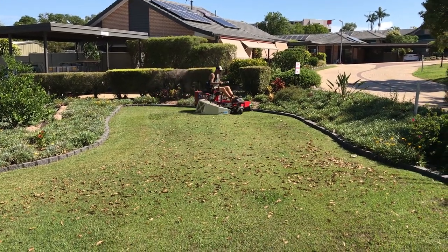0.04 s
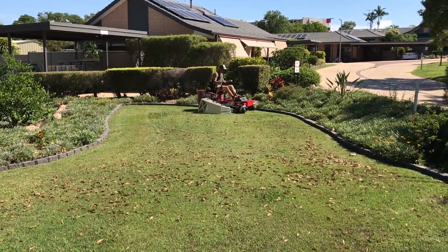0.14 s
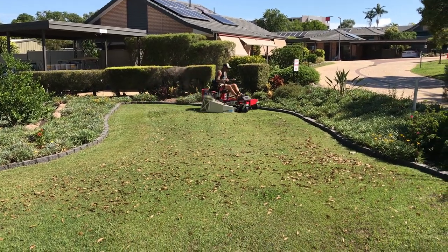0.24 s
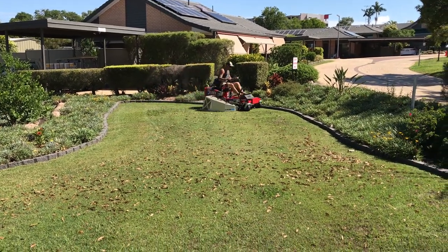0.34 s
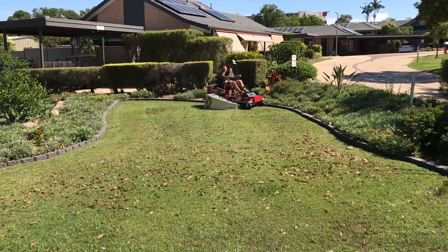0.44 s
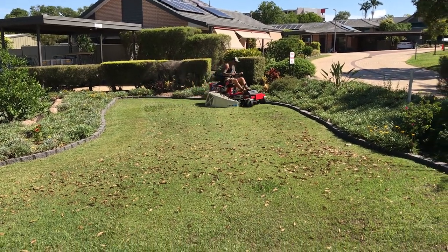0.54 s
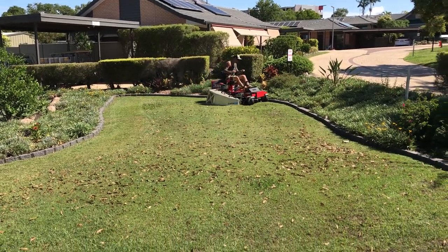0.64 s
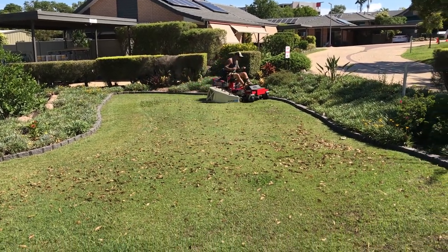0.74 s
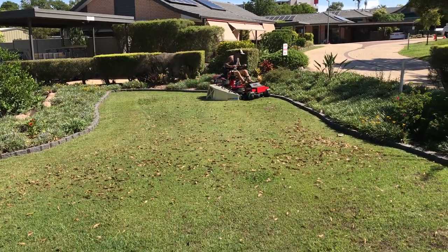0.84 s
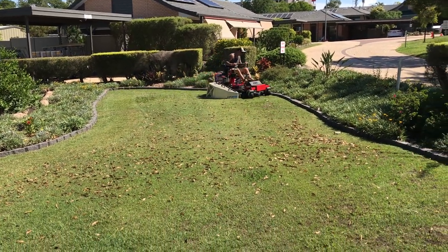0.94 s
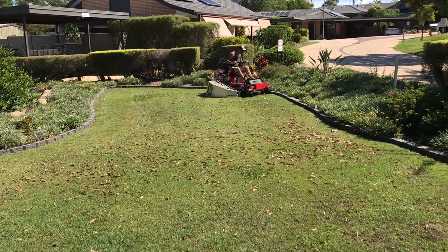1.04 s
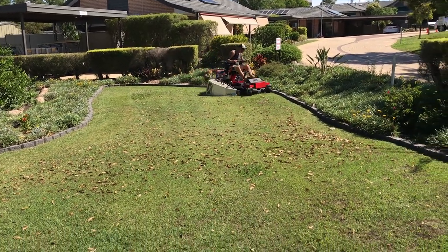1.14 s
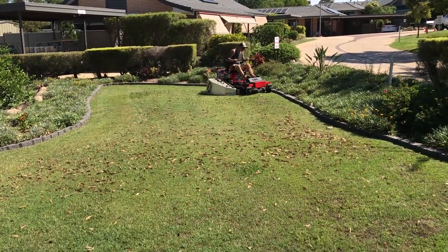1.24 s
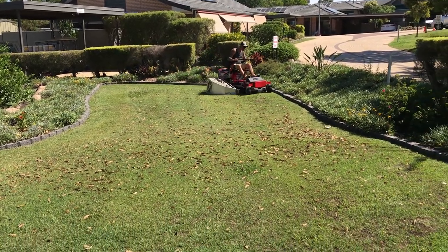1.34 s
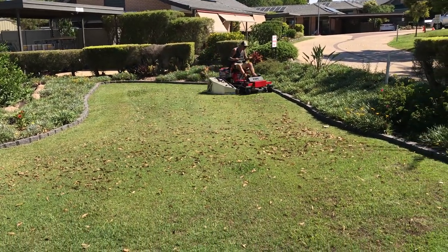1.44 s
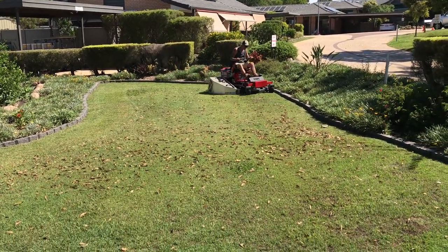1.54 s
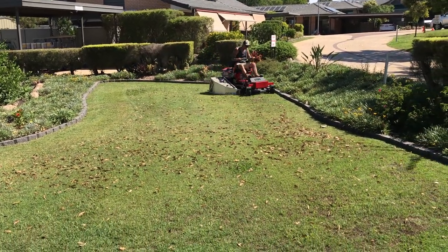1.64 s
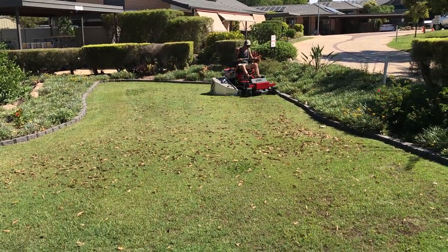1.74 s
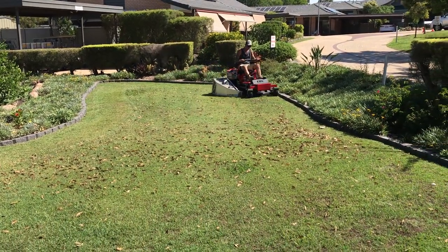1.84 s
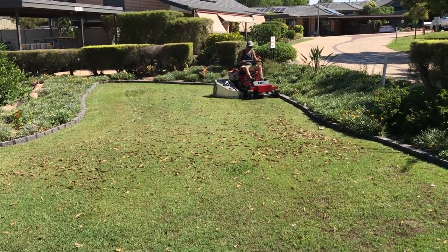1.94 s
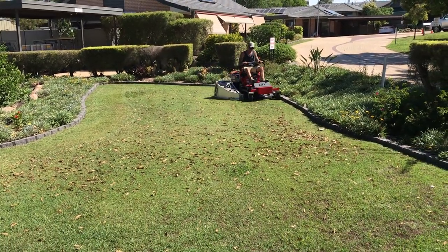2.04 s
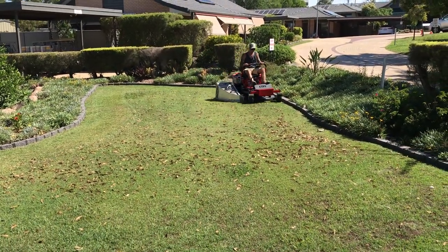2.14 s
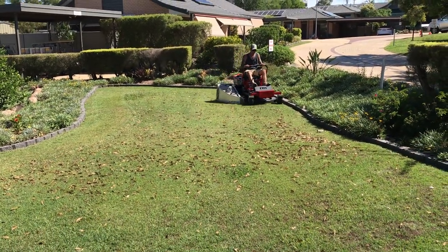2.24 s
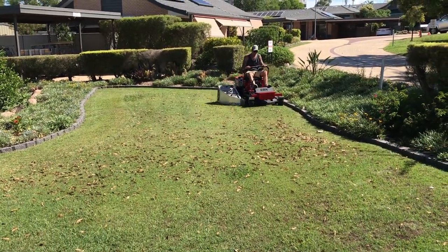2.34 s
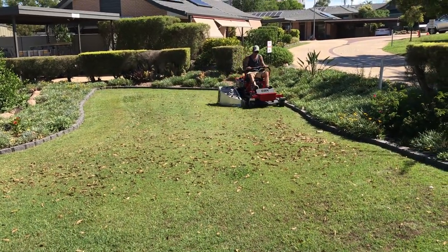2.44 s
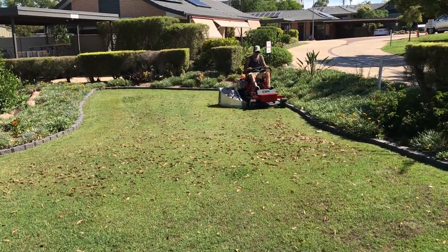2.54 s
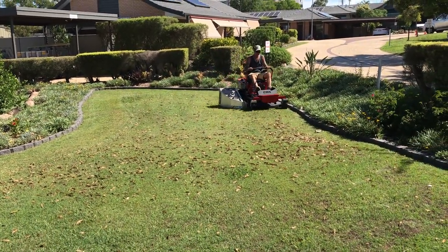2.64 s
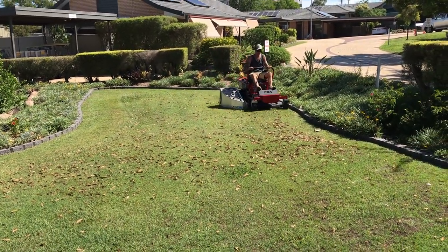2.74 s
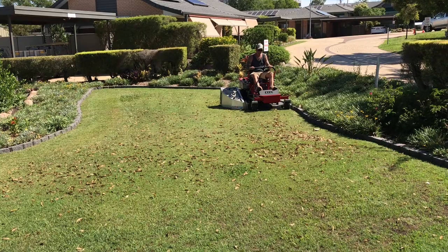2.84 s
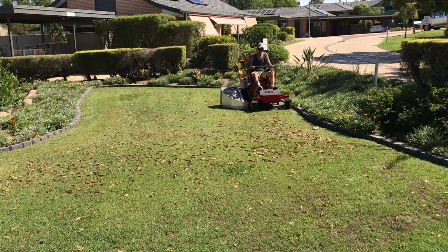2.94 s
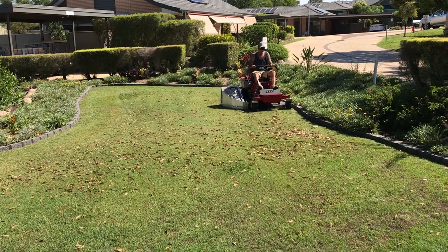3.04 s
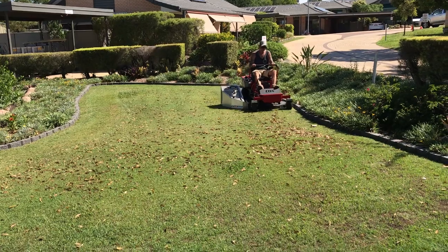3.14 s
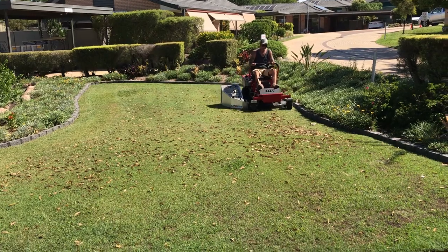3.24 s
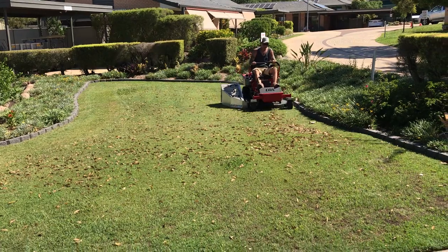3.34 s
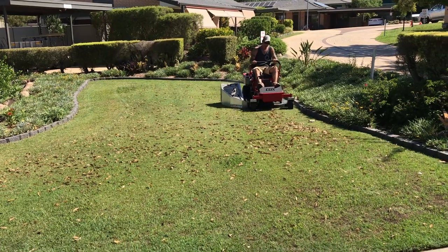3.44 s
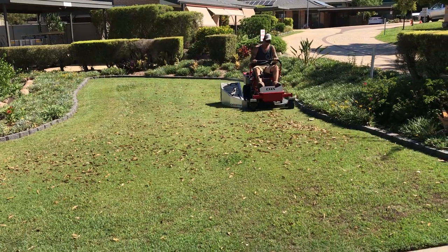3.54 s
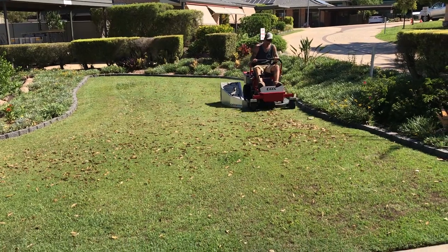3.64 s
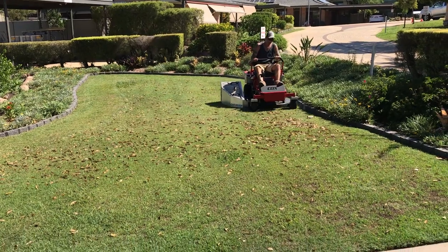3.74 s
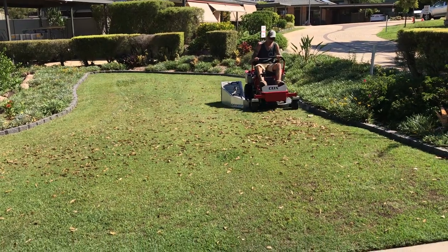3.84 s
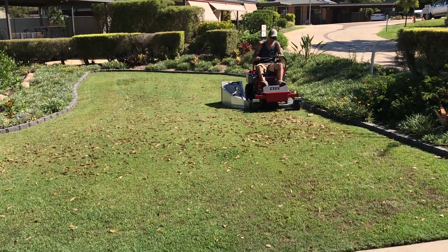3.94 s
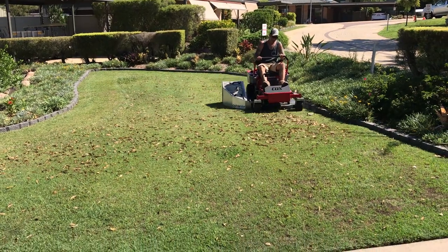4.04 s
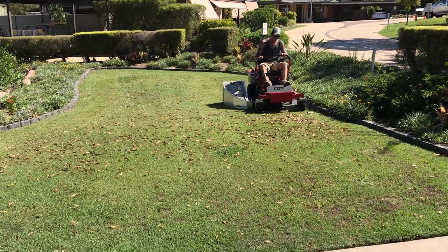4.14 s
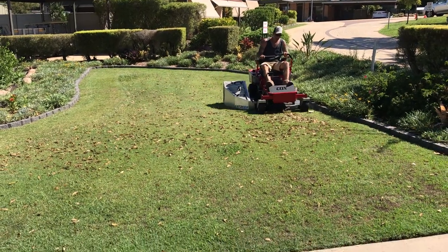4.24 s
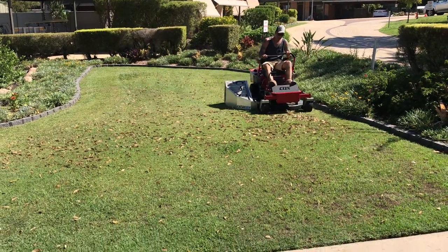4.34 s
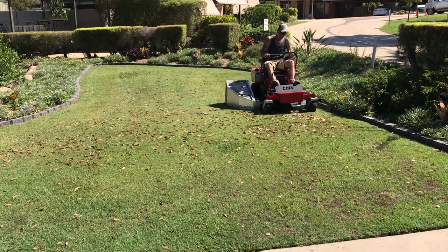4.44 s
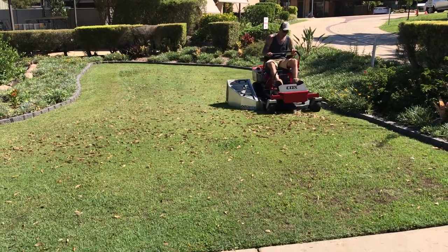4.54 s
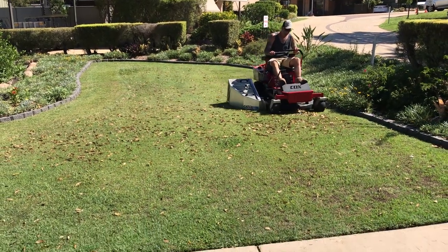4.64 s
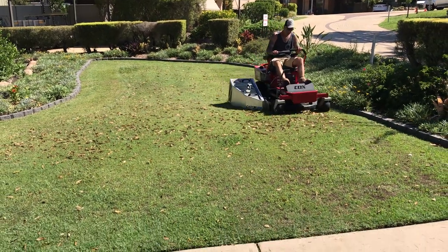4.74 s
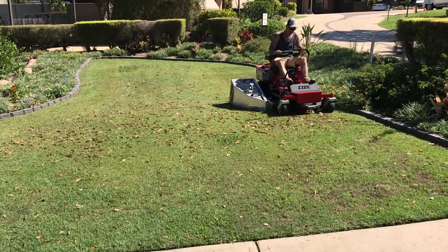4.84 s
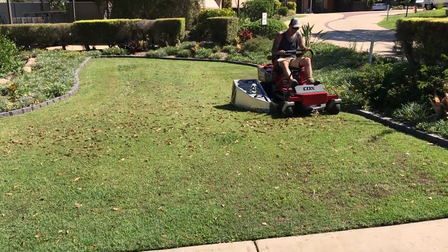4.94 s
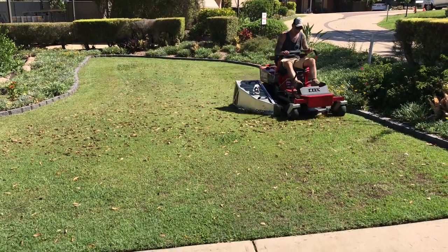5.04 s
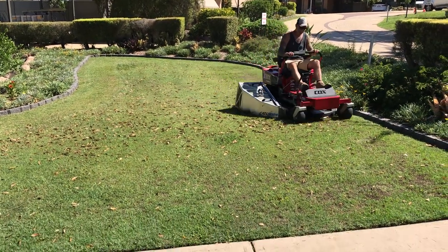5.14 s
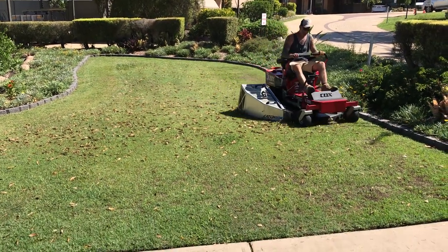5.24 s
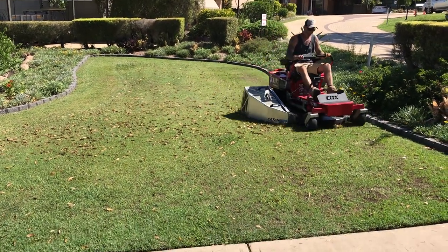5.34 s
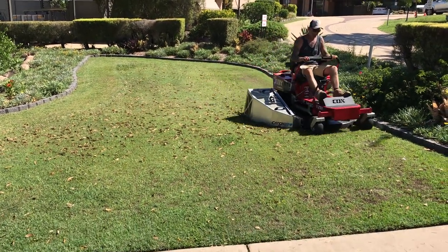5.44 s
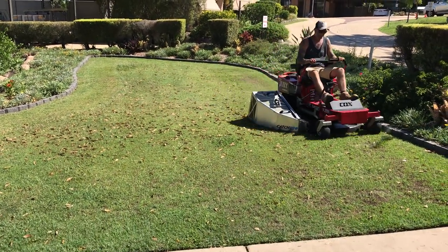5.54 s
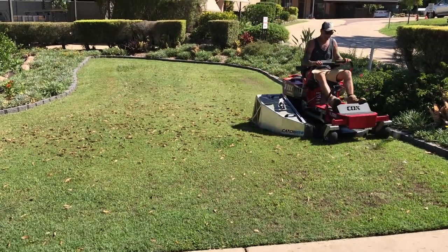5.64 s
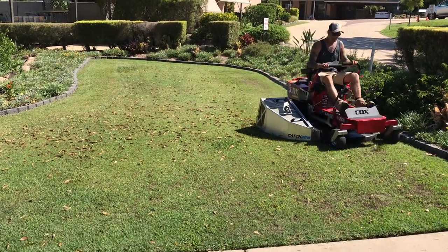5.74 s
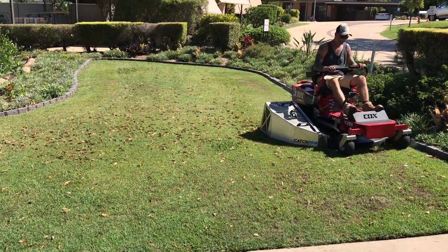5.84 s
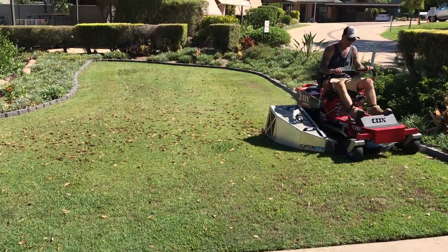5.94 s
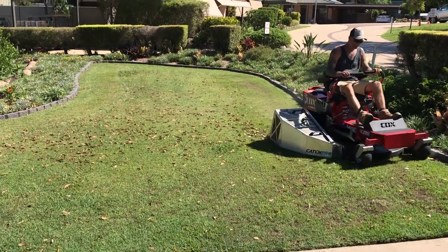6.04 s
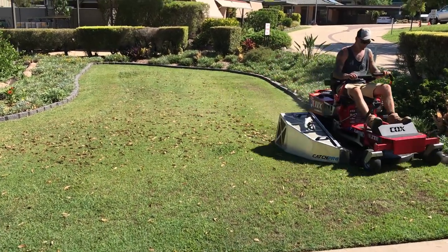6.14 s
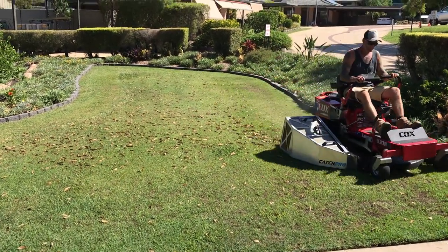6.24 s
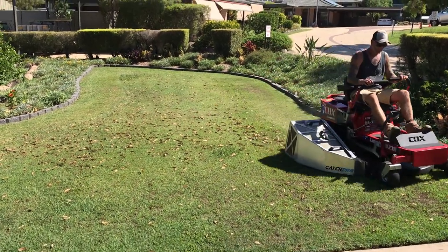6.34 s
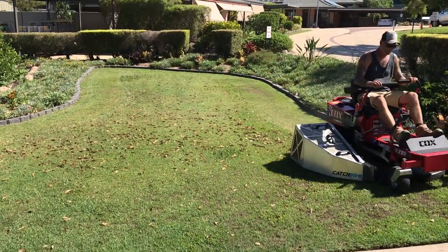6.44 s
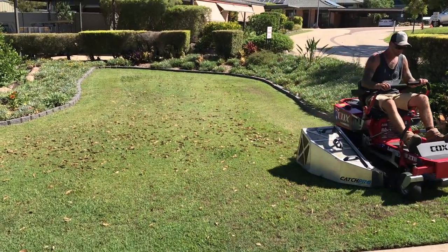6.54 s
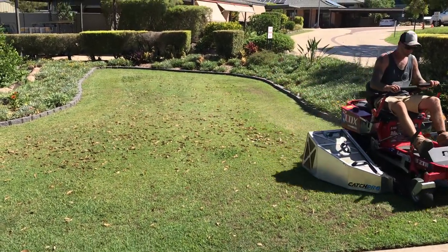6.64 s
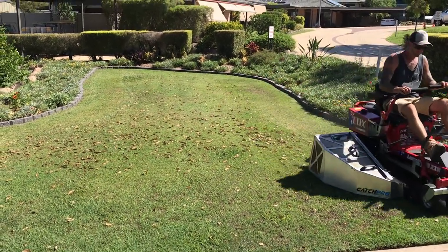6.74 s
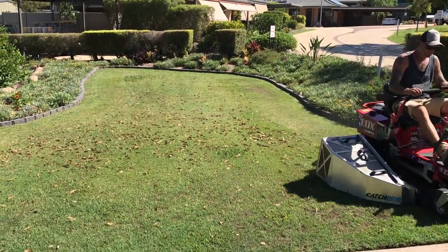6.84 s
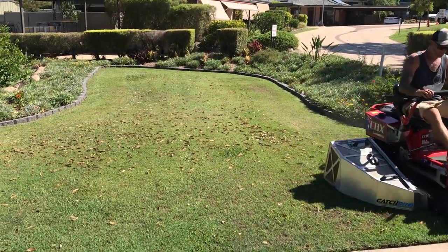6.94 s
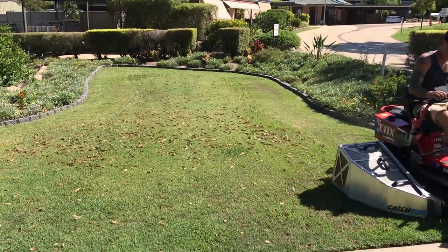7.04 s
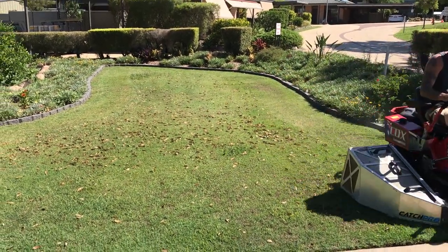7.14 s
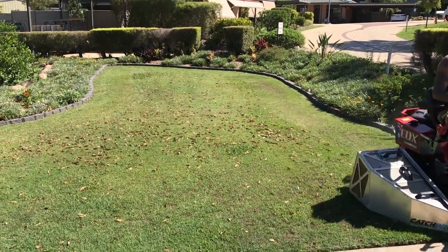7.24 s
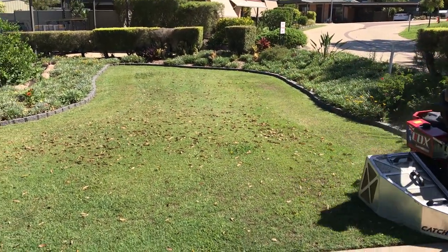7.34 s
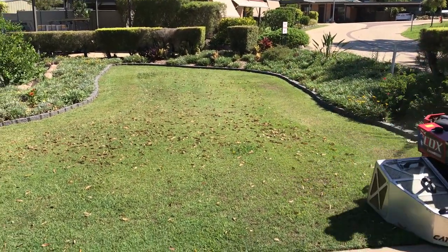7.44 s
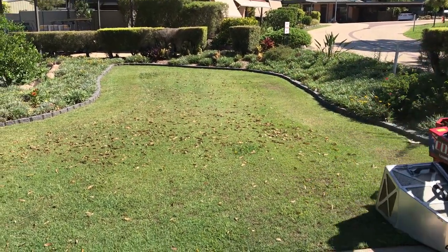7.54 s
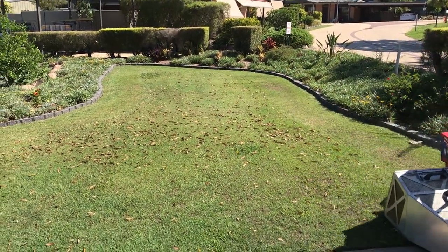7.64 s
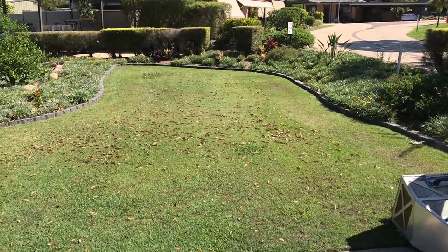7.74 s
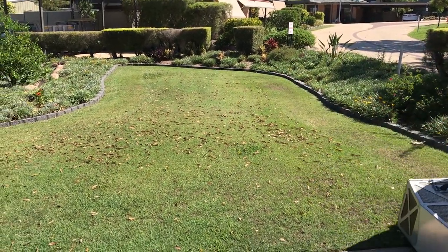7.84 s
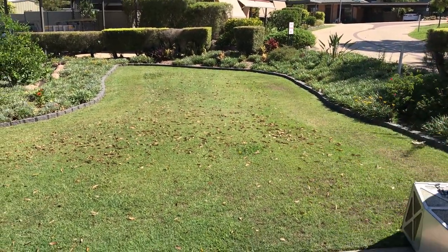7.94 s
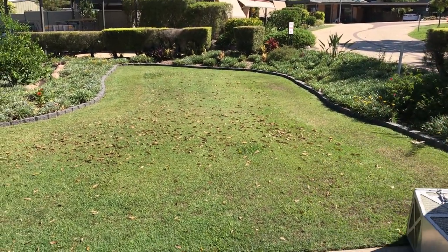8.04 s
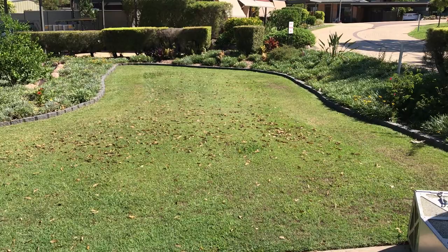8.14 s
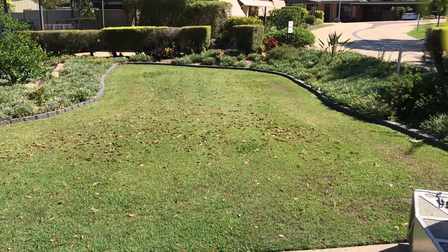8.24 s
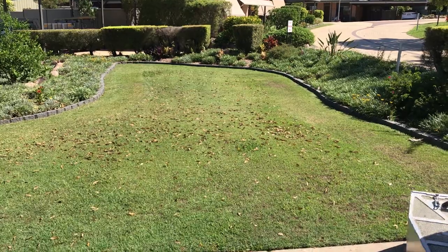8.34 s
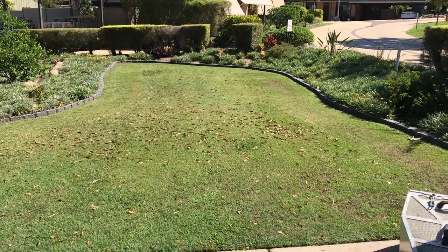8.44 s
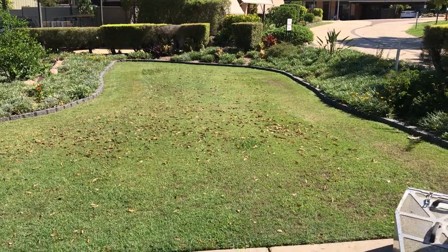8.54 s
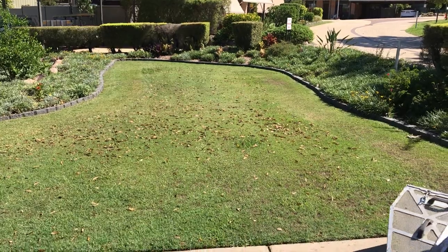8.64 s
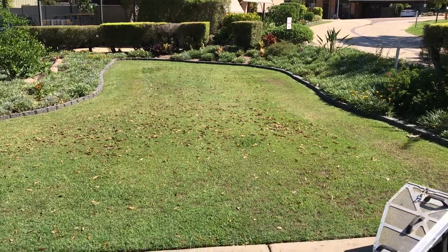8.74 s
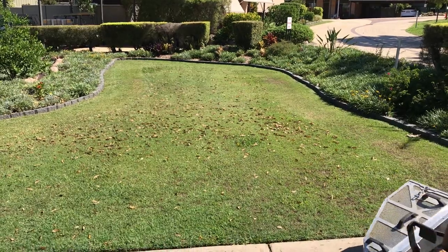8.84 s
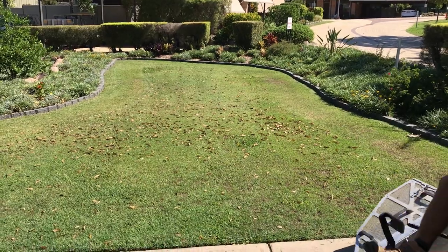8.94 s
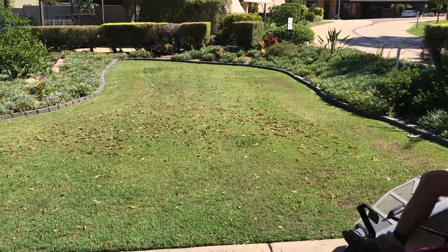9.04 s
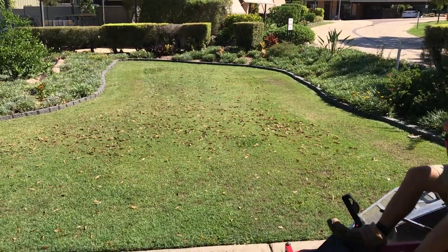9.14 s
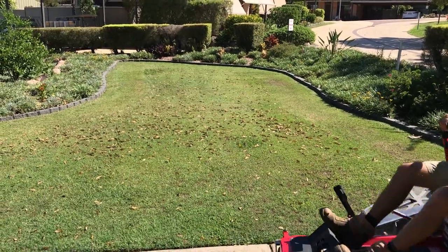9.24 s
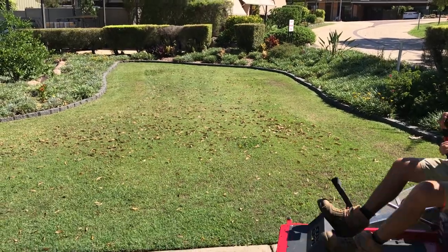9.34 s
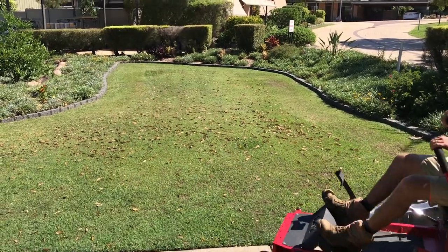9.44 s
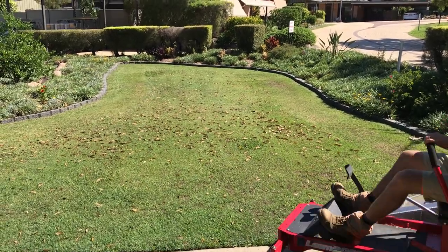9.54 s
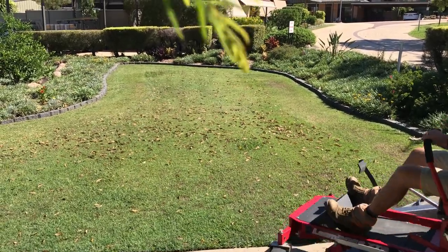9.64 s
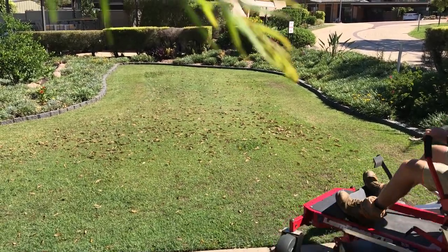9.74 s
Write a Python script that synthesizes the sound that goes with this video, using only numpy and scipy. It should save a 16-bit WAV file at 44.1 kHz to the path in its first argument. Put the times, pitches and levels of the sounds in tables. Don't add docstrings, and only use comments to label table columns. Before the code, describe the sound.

On an open lawn, a ride-on mower starts some distance away with a steady, lumpy engine thud and airy deck roar. It grows louder and fuller as it approaches, blades snapping grass and dry leaves, dull bumps underneath. A sharp belt squeak comes around eight seconds, then a loose panel buzzes and the frame groans in a tight turn beside the single phone microphone. The engine keeps running loudly to the end.

```python
import sys
import numpy as np
from scipy import signal
from scipy.fft import rfft, irfft
from scipy.io import wavfile
from scipy.ndimage import uniform_filter1d

SR = 44100
rng = np.random.default_rng(int(sys.argv[2]) if len(sys.argv) > 2 else 0)


def generate_wav(sig):
    pcm = np.round(np.clip(np.atleast_2d(sig).T, -1, 1) * 32767).astype(np.int16)
    wavfile.write(sys.argv[1], SR, pcm)


N = 432180
T = np.arange(N) / SR

# (time [s], nearness [dB], share of the flank facing the microphone [0-1],
# dry litter under the blades [dB])
DRIVE = [(0, 0.5, 0.03, -3), (.7, .5, 0.22, -4), (1.4, 0.6, 0.22, -3), (2.2, 0, 0.2, 1.5),
         (2.9, 0.5, 0.3, 0), (3.6, 0.5, 0.45, 3.5), (4.2, 0.4, 0.5, 3.5), (4.8, 1.14, 0.52, 6),
         (5.4, 1.5, 0.6, 9), (5.9, 2, 0.8, 3.5), (6.5, 3, 0.9, 2.5), (7.2, 3.5, 1, 1.5),
         (7.33, 5, 0.97, 3.5), (8.15, 6.5, 0.84, 1), (8.6, 6.5, 0.93, -2), (9.1, 7.5, 0.8, 2),
         (9.5, 7.5, 0.73, 2), (9.8, 7.5, 0.9, 7.5)]
# (time [s], level [dB])
BUMPS = [(1.28, -36), (1.75, -53), (2.02, -37), (3.0, -37.5), (4.05, -33), (4.8, -28), (5.75, -34),
         (6.2, -32), (6.96, -27), (7.27, -27), (7.55, -24), (8.25, -22.5), (8.75, -29), (9.38, -21)]
# (far off [dB], per dB of nearness [dB], flank full on [dB], per dB of litter [dB])
EXHAUST = (-30.5, 1.11, -1.85, 0)
SECOND_FIRING = .37


def undb(db):
    return np.exp(np.asarray(db) * (np.log(10) / 20))


def unit(x):
    return x / np.sqrt(np.mean(x ** 2))


def columns(table):
    s, *cols = np.transpose(table)
    return [np.interp(T, s, c) for c in cols]


def shape_db(points, hz):
    f, db = np.transpose(points)
    return np.interp(np.log(hz + 1), np.log(f), db)


def walk(rate):
    held = np.repeat(rng.standard_normal(int(N / SR * rate) + 2), 8)
    slewed = unit(uniform_filter1d(uniform_filter1d(held, size=8), size=8))
    return np.interp(T * rate * 8, np.arange(len(slewed)), slewed)


def band(x, lo_hz, hi_hz):
    return signal.sosfilt(signal.butter(2, [lo_hz, min(hi_hz, .45 * SR)], "band", fs=SR, output="sos"), x)


def beats(phase):
    return np.flatnonzero(np.diff(np.floor(phase)))


def follow(far_db, near, flank_db, litter):
    return far_db + np.dot([near, flank_db, litter], columns(DRIVE))


def jolts(late_s):
    return sum(np.exp(-.5 * ((T - s - late_s) / 0.087) ** 2) for s, _ in BUMPS)


def drive_whine(phase):
    # (start [s], end [s], multiple of the cycle rate, level [dB])
    whines = [(.3, 2.4, 14, -57), (0, 1.6, 15, -57), (.3, 2.4, 16, -58), (8.5, 9.1, 11, -33),
              (2.8, 3.8, 59, -56), (4.3, 5.5, 59, -54), (0, 1.5, 32, -50), (7, 8.4, 32, -44),
              (2.0, 5.3, 28, -47), (5.7, 7.4, 28, -46), (7.9, 8.4, 22.85, -42), (9.1, 9.3, 22.85, -38),
              (8.55, 9.4, 16, -40), (9.2, 9.9, 13, -34), (8.2, 9.1, 13, -40), (9.4, 9.9, 16, -38),
              (2.5, 5.5, 14, -51), (6, 7.8, 16, -51), (4.9, 5.6, 22.85, -50)]
    out = np.zeros(N)
    for start, end, k, db in whines:
        on = np.interp(T, [start - .15, start + .1, end - .1, end + .15], [0, 1, 1, 0])
        tone = np.sin(2 * np.pi * k * phase + 0.46 * walk(10))
        out += on * undb(db + 2 + 2.8 * walk(11)) * tone
    return out


def bumps():
    size = sum(undb(db) * np.exp(-.5 * ((T - s) / 0.048) ** 2) for s, db in BUMPS)
    return size * unit(band(rng.standard_normal(N), 34, 194))


def panel_buzz():
    # (middle [s], peak [dB], pitch [Hz], half length [s])
    swells = [(8.559, -16.5, 1125, .018), (8.588, -15.5, 1090, 0.025), (8.626, -14.5, 1103, 0.024),
              (8.653, -19, 1088, .01), (8.686, -21, 1080, 0.015), (8.718, -18, 1075, .02),
              (8.745, -25, 1078, .01), (8.784, -28, 1090, .014), (8.825, -20.5, 1095, 0.018),
              (8.848, -22, 1080, 0.019), (8.936, -31, 1110, 0.011), (8.96, -25, 1125, 0.015),
              (8.99, -23, 1095, .014), (9.029, -18.5, 1115, 0.015), (9.071, -25, 1095, .022),
              (9.126, -21, 1072, .026), (9.171, -18.5, 1075, .022), (9.214, -19, 1066, 0.028),
              (9.243, -26, 1070, 0.0092), (9.28, -27, 1072, .012), (9.303, -24, 1070, .014)]
    s, _, hz, _ = np.transpose(swells)
    size = undb(-37) * np.interp(T, [8.53, 8.56, 9.22, 9.3], [0, 1, 1, 0])
    for middle, db, _, half in swells:
        size = size + undb(db) * np.cos(np.pi / 2 * np.clip((T - middle) / half, -1, 1)) ** 1.1
    turn = 2 * np.pi * np.cumsum(np.interp(T, s, hz)) / SR + .55 * walk(60)
    ring = (1 + .22 * walk(110)) * np.sin(turn) + .25 * walk(90) * np.cos(turn)
    return size * (ring + .08 * np.sin(2 * turn))


def guard_rattle():
    # (start [s], end [s], level [dB])
    rattles = [
        (0, .25, -49),
        (1.25, 2.05, -50),
        (3.75, 3.95, -53),
        (4.35, 5.0, -48.5),
        (5.35, 5.55, -48),
        (6.05, 6.2, -43),
        (6.55, 7.0, -48),
        (8.52, 8.65, -41),
        (9.3, 9.7, -44),
    ]
    spells = np.zeros(N)
    for a, b, db in rattles:
        spells += undb(db) * np.interp(T, [a - .05, a + .05, b - .05, b + 0.054], [0, 1, 1, 0])
    return spells * undb(2.3 * walk(13)) * unit(band(rng.standard_normal(N), 2140, 2350))


def frame_groan():
    # (time [s], level [dB])
    groans = [
        (8.5, -47),
        (8.65, -31),
        (8.85, -26.5),
        (9.05, -30),
        (9.2, -32),
        (9.4, -54),
    ]
    on = np.interp(T, [8.5, 8.54, 9.33, 9.4], [0, 1, 1, 0])
    return on * unit(band(rng.standard_normal(N), 296.0, 341)) * undb(columns(groans)[0])


def belt():
    # (middle [s], peak [dB], pitch [Hz], half length [s])
    squeaks = [(2.035, -31, 4670, 0.0068), (3.443, -38, 4600, .012), (4.335, -39, 4590, .008),
               (4.377, -38, 3800, .005), (5.937, -31, 4590, .004), (5.943, -31, 4560, .004),
               (6.752, -34, 4590, .005), (6.770, -27, 4560, 0.005), (6.78, -36, 4480, .005),
               (7.108, -36, 4620, .004), (7.287, -33, 4640, .004), (7.293, -31, 4610, .005),
               (7.313, -33, 4450, .005), (7.334, -27, 4600, 0.008), (7.333, -32, 5200, 0.008),
               (7.705, -31, 6800, .005), (7.81, -30, 6750, .006), (4.607, -40, 4580, .01),
               (8.052, -27, 4560, .003), (8.0565, -17.5, 4690, .0035), (8.075, -22, 4600, .003),
               (8.0612, -14, 4660, 0.0055), (8.0677, -6, 4570, .0045), (8.0722, -11, 4640, 0.0027),
               (8.077, -25, 4600, .003), (8.082, -19, 4620, 0.003), (8.0865, -16.5, 4610, 0.005),
               (8.0945, -26, 4540, .002)]
    base_hz, sag_hz_per_s = 4620, 12000
    out = np.zeros(N)
    waver = walk(400)
    for s, db, hz, length in squeaks:
        i = np.arange(int((s - length) * SR), int((s + length) * SR))
        late = T[i] - s
        swell = np.cos(np.pi / 2 * late / length) ** 2
        size = undb(db) * swell * undb(1.0 * waver[i - 300])
        turn = 2 * np.pi * (base_hz * s + (hz - sag_hz_per_s / 2 * late) * late) + 0.3 * waver[i]
        overtones = 0.37 * np.sin(2 * turn) + 0.16 * np.sin(3 * turn)
        out[i] += size * (np.sin(turn) + size ** 0.54 * (1 + late / length) ** 2 * overtones)
    return out


def clatter(phase):
    # (frequency [Hz], level [dB])
    knock_colour = [(300, -30), (450, -8), (620, -0.5), (950, -2), (1300, -4.5), (2250, -8.5), (2600, -25)]
    # (multiple of the stroke rate, level against the clatter [dB])
    pump_tones = [(2, -8.5), (3, -13.5), (4, -9.5), (5, -8), (6, -11), (7, -12.5), (8, -11)]
    decay_cycles, strokes_per_cycle = 0.13, 11.425
    turn, k = np.arange(1024) / 1024, np.arange(513)
    knocks = 0.4 + np.exp(-turn / decay_cycles) + np.exp(-((turn - SECOND_FIRING) % 1) / decay_cycles)
    colour = undb(shape_db(knock_colour, 29 * k) + 5 * (k % 4 == 0)) * (k < 95)
    out = np.zeros(N)
    for pattern in irfft(rfft(knocks * rng.standard_normal((4, 1024))) * colour):
        out += np.interp(phase % 1, turn, unit(pattern), period=1) * walk(1.2) / 2
    for m, db in pump_tones:
        tone = np.sin(2 * np.pi * round(m) * strokes_per_cycle * phase + .4 * walk(6))
        out += undb(db + 4 * walk(2.5)) * tone
    return out * undb(follow(far_db=-50, near=1.15, flank_db=6.5, litter=0))


def snaps(hits, lo_hz, hi_hz, tail_s):
    tail = np.exp(-np.arange(SR // 50) / (tail_s * SR))
    noise = band(rng.standard_normal(N), lo_hz, hi_hz)
    even = noise / np.sqrt(uniform_filter1d(noise ** 2, size=48) + 1e-9)
    return signal.fftconvolve(hits, tail)[:N] * even


def blades(cycle):
    # (time [s], peak [dB], body
    # of the crack against its top [dB])
    leaves = [(0.0815, -26, -16), (0.2289, -29, -7), (0.598, -29, -15), (1.032, -29, -14),
              (1.2092, -27, -19), (1.2695, -33, -15), (1.4646, -31, -16), (1.6152, -33, -11),
              (2.0343, -28, -7), (2.6344, -34, -12), (3.5743, -24, -8), (3.7314, -31, -14),
              (3.9175, -27, -15), (4.0048, -31, -10), (4.021, -22, -15), (4.0492, -28, -12),
              (4.2258, -34, -11), (4.2453, -23, -5), (4.3745, -25, -4), (4.39, -25, -8), (4.4214, -30, -11),
              (4.4363, -24, -13), (4.4947, -23, -13), (4.6448, -31, -16), (4.7042, -24, -15),
              (4.8703, -28, -10), (4.8853, -30, -12), (4.9008, -23, -8), (5.0045, -25, -15),
              (5.0779, -24, -13), (5.0928, -25, -13), (5.1223, -18, -18), (5.1971, -29, -9),
              (5.2255, -21, -15), (5.3308, -26, -6), (5.3597, -25, -10), (5.3901, -29, -9),
              (5.4809, -30, -7), (5.4969, -23, -9), (5.5265, -21, -7), (5.5847, -25, -10),
              (5.6296, -24, -24), (5.8691, -23, -11), (5.8995, -31, -17), (6.0187, -29, -15),
              (6.0741, -30, -14), (6.0906, -23, -20), (6.677, -16, -21), (6.884, -23, -9),
              (7.199, -29, -16), (7.2709, -24, -16), (7.302, -19, -22), (7.449, -27, -13),
              (7.4655, -19, -14), (7.923, -26, -9), (8.0222, -29, -6), (8.0651, -26, 7), (8.1125, -25, -16),
              (9.3781, -28, -10), (9.5138, -21, -8)]
    # (time [s], peak [dB])
    twigs = [(2.0343, -26), (4.2552, -30), (4.3898, -25), (4.5835, -29), (4.839, -28), (4.9008, -33),
             (5.0784, -30), (5.3592, -25), (5.4969, -29), (5.5258, -23), (5.585, -26), (5.8381, -26),
             (7.286, -25), (7.434, -22)]
    passes_per_cycle, one_pass_s = 2.313, 4.8995
    phase = passes_per_cycle * (cycle - np.interp(one_pass_s, T, cycle))
    snap_db = follow(far_db=-54, near=0.97, flank_db=4.5, litter=1) + 1.5 * walk(14)
    at = beats(phase)
    late, luck = rng.random((800, 2))[:len(at)].T
    at = np.clip(at + (late * .005 * SR).astype(int), 0, N - 1)
    grass = np.zeros(N)
    grass[at] = undb(snap_db[at] + 2.5 - 3.8 * np.log(luck + .07) + 1.2 * walk(6)[at])

    high, low, thin = np.zeros((3, N))
    s, peak_db, body_db = np.transpose(leaves)
    i = (s * SR).astype(int)
    crack_db = peak_db + np.minimum(body_db, -13.5) + 3
    high[i] = undb(crack_db)
    low[i] = undb(crack_db - 17)
    thin[i] = undb(peak_db - 3)
    s, peak_db = np.transpose(twigs)
    i = (s * SR).astype(int)
    low[i] += undb(peak_db - 3)
    high[i] += undb(peak_db - 7)

    hum_db = follow(*EXHAUST)
    out = undb(hum_db - 15) * np.sin(2 * np.pi * phase) + undb(hum_db - 12.5) * np.sin(4 * np.pi * phase)
    out += snaps(grass + high, 7700, 12100, 0.0021)
    out += snaps(undb(3.0) * grass + thin, 11400, 21000, 0.0023)
    return out + snaps(low + undb(0.5) * grass, 2300, 7300, 0.0018)


def deck(phase):
    # (frequency [Hz], density [dB per Hz])
    air_colour = [(35, 2), (60, 9), (100, 4.5), (200, 8), (320, -0.5), (450, -4), (800, -3.5), (1100, -3.5),
                  (1400, -5), (1900, -7.5), (2300, -10), (5000, -8.5), (9000, -8.5), (16000, -6)]
    # (frequency [Hz], width [Hz], level [dB])
    resonances = [(328, 32, 5.5), (418, 106, -7.5), (670, 24, 3), (830, 40, 3.5), (930, 22, 2),
                  (1015, 31, 1.5), (1320, 35, 2.5), (1645, 30, 3.5), (2170, 210, 2), (4180, 150, -0.5),
                  (5020, 140, -4)]
    body_db = follow(-40, 0.66, 12, 0.1)
    region_octave = np.log2([200, 400, 750, 1400, 2200, 4600, 7000, 11000])
    level_db = [
        follow(*EXHAUST) - 9,
        follow(-41, 1.29, 13, 0),
        body_db,
        follow(-40.5, 2, 1.2, 0.4),
        follow(-38.5, 1.69, -1.5, 0.11),
        follow(-46, 3, 1.5, 0.2),
        follow(-48, 2.5, -5, 0.36),
        follow(-53.5, 1.05, 3.9, 0.85),
    ]
    hz = np.fft.rfftfreq(N, 1 / SR)
    colour_db = shape_db(air_colour, hz)
    colour_db = colour_db + sum(db / (1 + (2 * (hz - f) / width) ** 2) for f, width, db in resonances)
    noise = rfft(unit(irfft(rfft(rng.standard_normal(N)) * undb(colour_db), N)))
    turn = 2 * np.pi * phase
    throb = np.cos(turn) + 1.4 * np.cos(2 * turn + 2.6) + 0.73 * np.cos(3 * turn + 1.0)
    gust = walk(22)
    out = np.zeros(N)
    for octave in np.arange(5, 14.2, 1 / 3):
        mask = np.cos(np.pi / 2 * np.clip(3 * (np.log2(hz + 1) - octave), -1, 1)) ** 2
        place = np.interp(octave, region_octave, np.arange(len(region_octave)))
        k = min(int(place), len(region_octave) - 2)
        db = level_db[k] + (place - k) * (level_db[k + 1] - level_db[k])
        db = db + .8 * walk(2.5) + .5 * walk(12)
        if octave < 11.5:
            db = db + 0.5 * throb
        else:
            db = db + .75 * gust * np.clip(octave - 12, .3, 1.5)
        if 11.2 < octave < 11.7:
            db = db - 0.22 * (body_db + 31.0)
        out += irfft(noise * mask, N) * undb(db)
    return out * undb(8.0)


def engine():
    # (time [s], cycle rate [Hz])
    speed = [(0.0, 29.0), (1.39, 28.93), (2.07, 28.7), (2.73, 29.1), (3.25, 28.8), (3.47, 29.15),
             (4.5, 29.08), (4.69, 28.75), (5.1, 29.1), (5.48, 28.7), (5.95, 29.35), (6.66, 28.75),
             (6.85, 29.0), (7.69, 29.0), (7.97, 29.3), (8.9, 29.05), (9.2, 29.1), (9.8, 28.8)]
    # (multiple of the cycle rate, level [dB])
    partials = [(2, -6.5), (3, -34), (4, -14), (5, 0.5), (6, -7), (7, -7.5), (8, -1.5), (9, -9), (10, -10),
                (11, -13), (12, -34), (13, -19.5), (14, -16), (16, -21.5), (18, -26), (19, -22), (20, -22),
                (21, -23.5), (28, -31), (32, -21.5)]
    # (time [s], level [dB])
    frame_shake = [(0, -42), (.5, -45), (.75, -41), (1.75, -41), (2.4, -45), (3.6, -45), (4.5, -40),
                   (5.3, -41), (5.7, -36.5), (6.9, -34), (7.07, -39), (7.25, -33), (7.8, -39), (8.08, -31),
                   (9.8, -27.5)]
    # (time [s], gain [dB], width [s])
    falters = [(.93, -3, .015), (1.64, -3, 0.015), (2.614, -4, 0.047), (3.133, -10, 0.031),
               (3.549, -8, 0.027), (3.752, -5, .018), (4.236, -1, 0.016), (6.698, -4, .04), (7.04, -1, .02),
               (7.893, -7, 0.026), (8.233, -7, .018), (9.37, -11, .012)]
    second_db = 3
    phase = np.cumsum(columns(speed)[0]) / SR

    shake_db = columns(frame_shake)[0] + 7 + 1.1 * walk(8) + 3.5 * jolts(0)
    exhaust_db = follow(*EXHAUST) + .45 * walk(6) - 0.5 * jolts(.1)
    exhaust_db = exhaust_db + sum(db * np.exp(-.5 * ((T - s) / width) ** 2) for s, db, width in falters)
    middle_db = follow(far_db=-7, near=-0.58, flank_db=9, litter=0) + 2.0
    upper_db = follow(far_db=-19, near=0, flank_db=12, litter=0.5) + 6.5
    away_db = -9 * np.exp(-T / 0.57)

    punch_db, uneven, scatter_db = .8 * walk(26), phase + .001 * walk(40), .6 * walk(45)
    out = np.zeros(N)
    for k, db in partials:
        level_db = shake_db if k == 2 else exhaust_db
        if k > 5:
            level_db = level_db + (middle_db if k < 10 else upper_db) + punch_db * (.4 if k == 8 else 1)
            level_db = level_db + away_db * (k < 13)
        twin = np.angle(1 + undb(second_db) * np.exp(-2j * np.pi * k * SECOND_FIRING))
        waver = min(k / 20, 1)
        loose = (.25 if k < 12 else .45) * waver * walk(6)
        pipe = 4.5 / k - 1.9
        turn = 2 * np.pi * k * uneven + twin + pipe + loose
        out += undb(db + level_db + (.1 + 2.2 * waver) * walk(7)) * np.sin(turn)
    return out * undb(scatter_db + 1.1), phase


def scene():
    motor, phase = engine()
    mono = drive_whine(phase) + bumps() + panel_buzz() + guard_rattle() + frame_groan() + belt()
    mono = mono + clatter(phase) + blades(phase) + deck(phase) + motor
    return np.array([mono, mono])


def top_cut(x):
    return signal.sosfilt(signal.butter(12, 16940, fs=SR, output="sos"), x)


def record(dry):
    # (frequency [Hz], level [dB])
    port_colour = [(2350, 0.5), (2550, -3.5), (2950, -4.5), (3400, -1), (4600, 0.5), (6000, 3),
                   (7300, -0.5), (9200, 0.5), (10400, -5.5), (11200, -2), (13500, -3.5), (15700, -6)]
    hz = np.fft.rfftfreq(N, 1 / SR)
    mix = irfft(rfft(dry) * undb(shape_db(port_colour, hz)) * (hz < 15900), N)
    mix = signal.sosfilt(signal.butter(4, 40, "high", fs=SR, output="sos"), mix)
    return top_cut(mix)


dry = scene()
out = record(dry)
generate_wav(out)
```